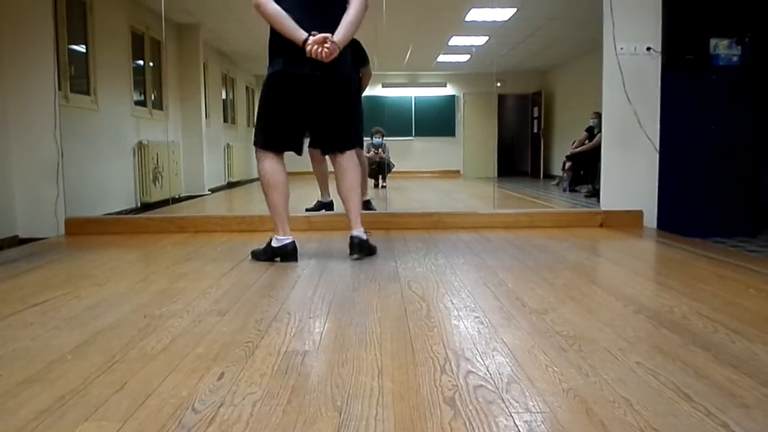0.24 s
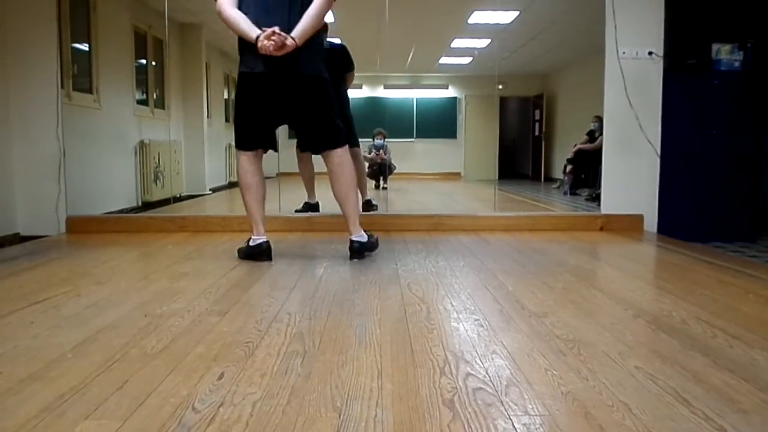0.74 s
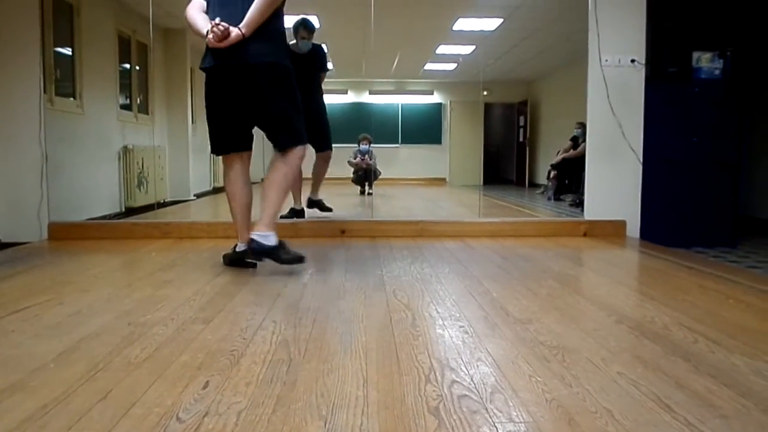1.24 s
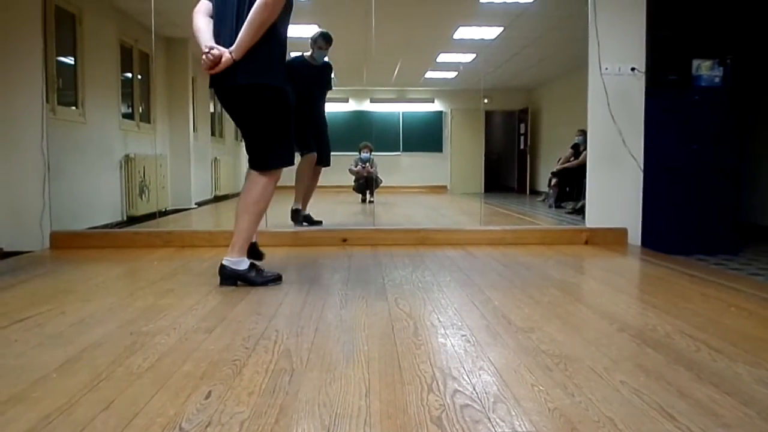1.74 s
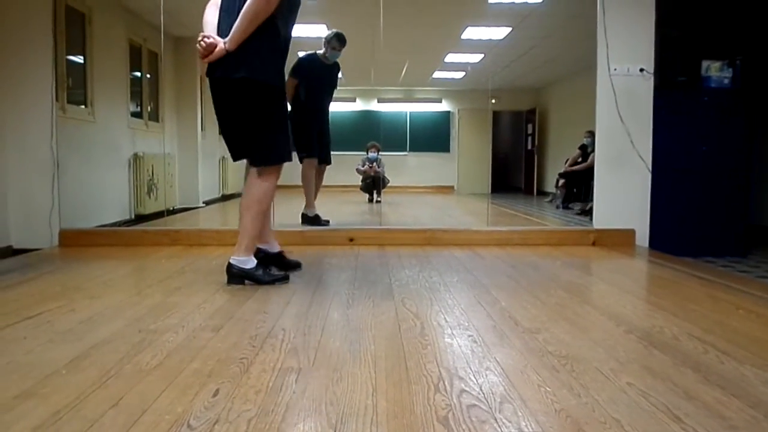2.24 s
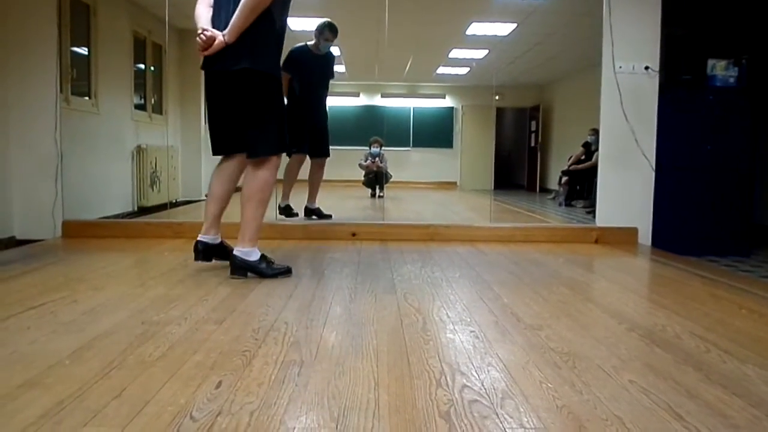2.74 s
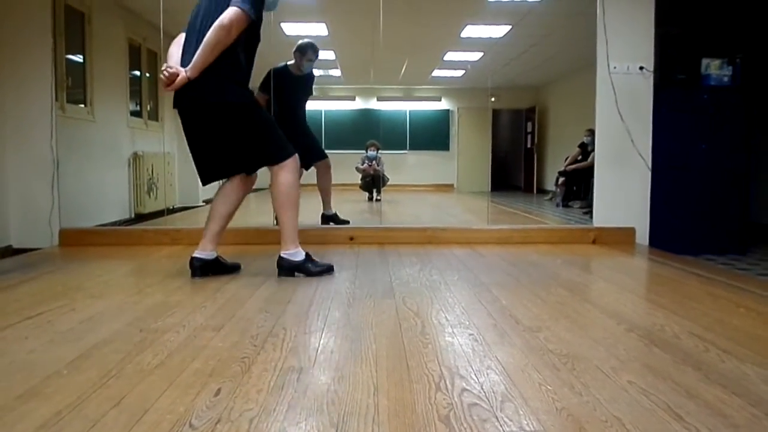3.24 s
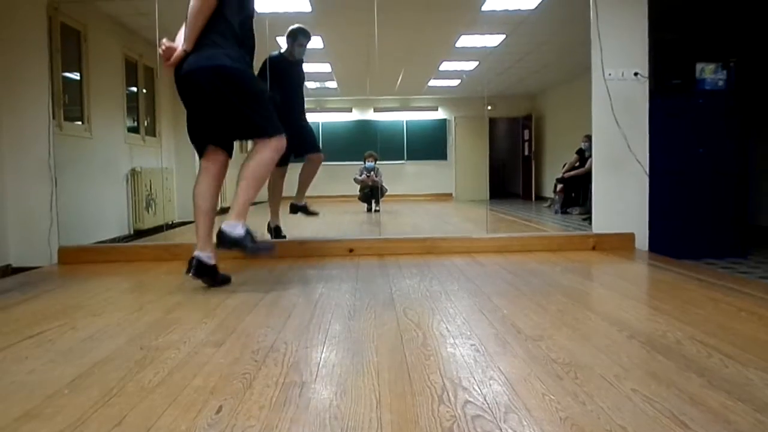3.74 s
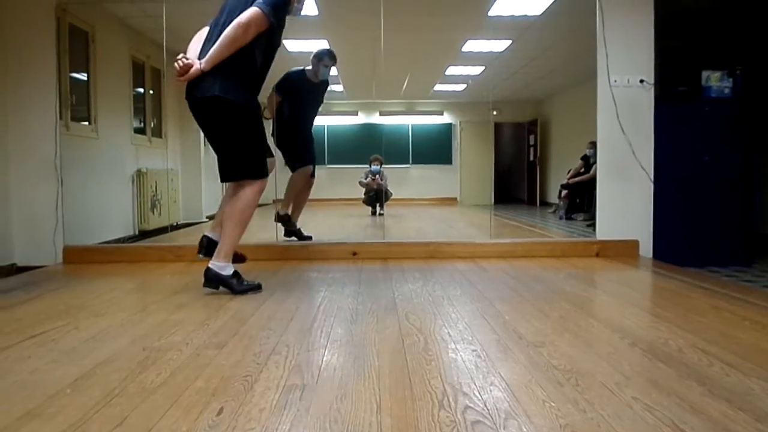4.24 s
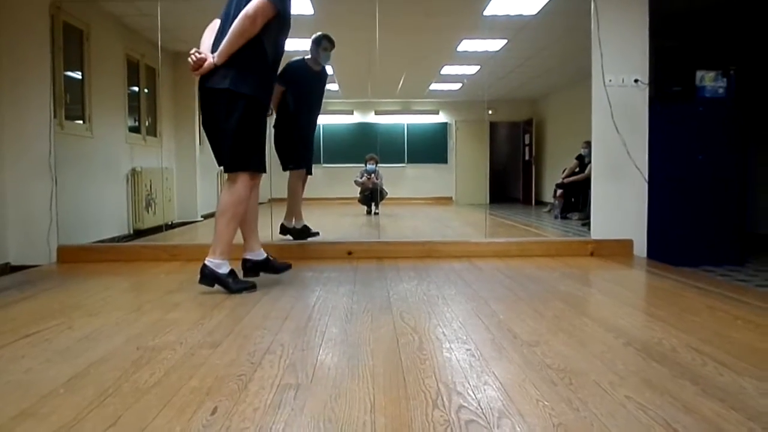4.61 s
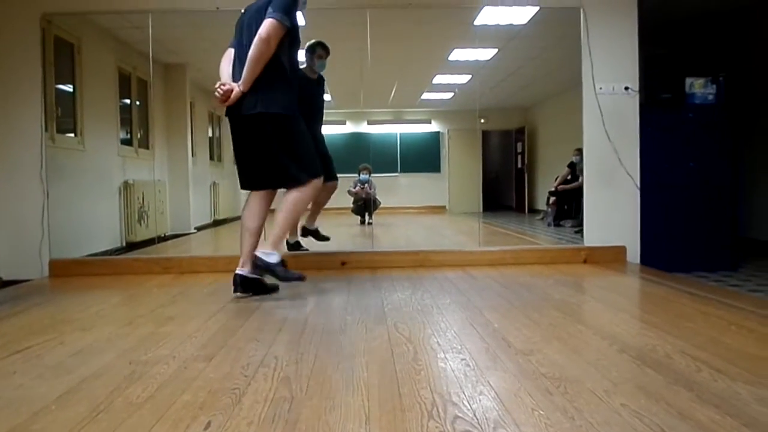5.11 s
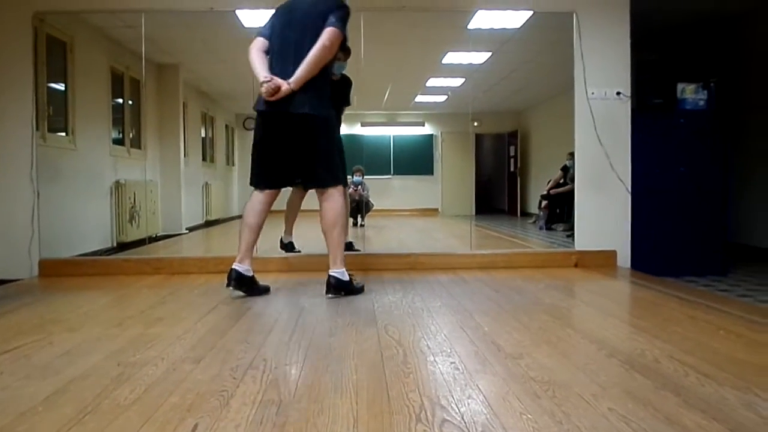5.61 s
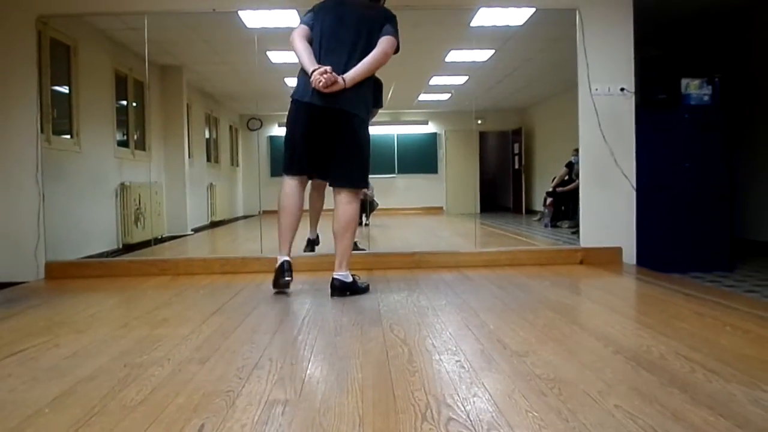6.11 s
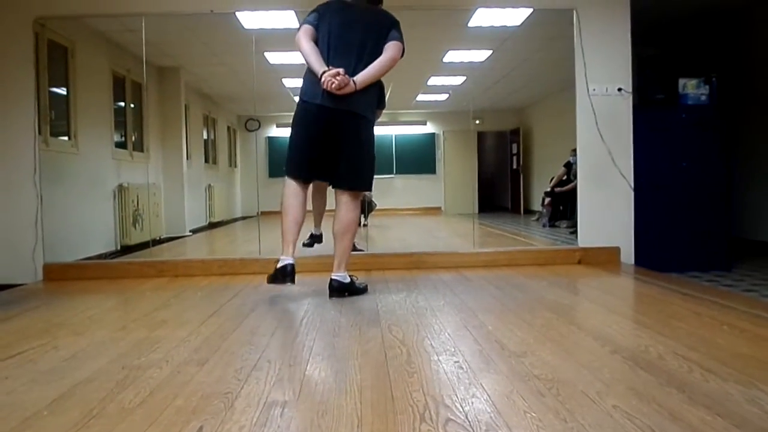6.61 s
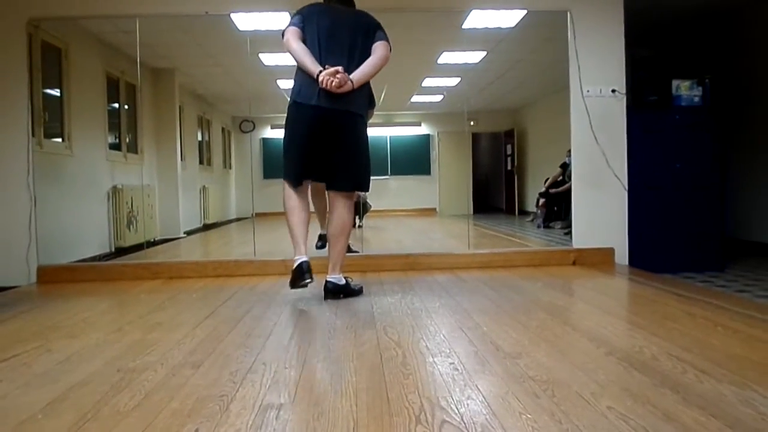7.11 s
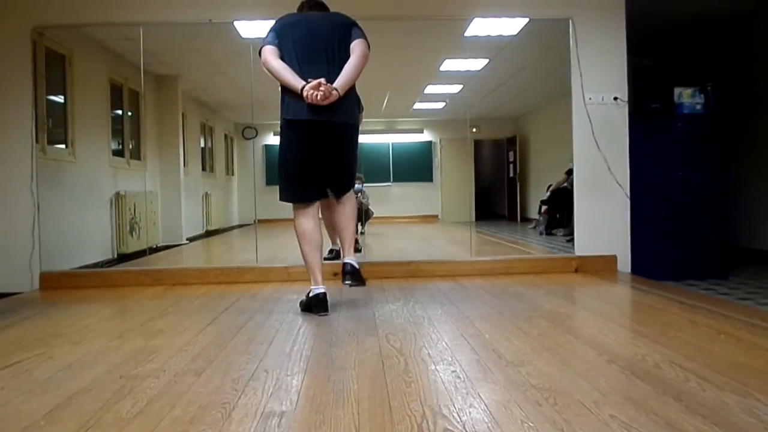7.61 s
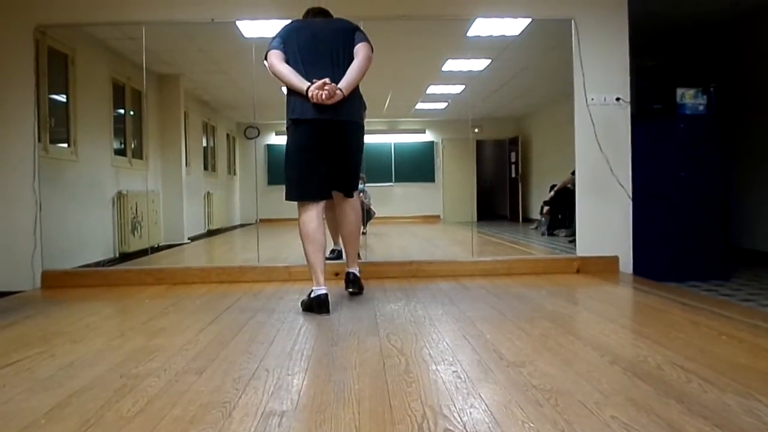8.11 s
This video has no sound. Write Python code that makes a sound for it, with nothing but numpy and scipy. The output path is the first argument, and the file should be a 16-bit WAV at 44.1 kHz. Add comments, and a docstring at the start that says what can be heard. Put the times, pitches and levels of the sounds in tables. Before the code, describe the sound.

Hard tap shoes strike a wooden floor in slow, uneven steps, each sharp crack ringing through a reverberant studio.

```python
"""A dancer's hard, nailed shoes stamp slow, uneven steps on a wooden studio floor, a few metres away.
Each impact cracks, knocks the boards and excites the floor's low modes; ceiling, mirror and walls
reflect it, then the room reverberates. Twice the nails skid with a zing; now and then a toe plate clinks.
Soles slide softly between steps, over faint room noise and a deep hum that comes and goes."""
import sys
import numpy as np
from scipy import signal
from scipy.fft import rfft, irfft, next_fast_len
from scipy.io import wavfile
from scipy.ndimage import uniform_filter1d

SR = 44100
rng = np.random.default_rng(int(sys.argv[2]) if len(sys.argv) > 2 else 0)


def master(y):
    """Save y as 16-bit WAV."""
    cut = np.clip(np.atleast_2d(y).T, -1, 1)
    pcm = np.round(cut * 32767)  # scale
    wavfile.write(sys.argv[1], SR, pcm.astype(np.int16))


N = 368235
TIME = np.arange(N) / SR
AGE = np.arange(57600) / SR  # seconds since an impact

# Blows of heel and sole. Each row: start in seconds, force in dB, weight on the foot in dB, brightness
# in dB, the struck spot's resonance in Hz, its height in dB, relative level of the direct crack in dB.
FOOTFALLS = [(0.052, 11, 11.5, -6.5, 1076, 11, -1), (0.279, -7, -14, 6, 7900, 12.5, -5),
             (0.298, 14.5, 7, -11.5, 1110, 5.5, 0), (0.591, 10, 16, -2, 924, 10.5, -4),
             (1.1313, 10, -2.5, 2.5, 4000, 3, -1.5), (1.436, 13, 0, -2.5, 2136, 3.5, -2.5),
             (1.975, 15.5, 1, -12, 830, 7, -5), (1.9962, 15, 9.5, -3.5, 5200, 4.5, 3),
             (2.281, 2.5, 15.5, 3.5, 1620, 7, -9), (2.816, 17.5, -0.5, -3.5, 7650, 8, -8.5),
             (3.116, 15, 5, -8.5, 1060, 3, -3.5), (3.137, 10, 10, 1, 7746, 3, 2.5),
             (3.541, -14, 0, -28, 990, -2, 3.5), (3.748, 7, 4, 4.5, 3200, 6.5, -5),
             (3.8322, 11.5, -5.5, -3.5, 560, 2, -2.5), (3.944, 7, -0.5, 2.5, 6770, 8, 0.5),
             (4.442, 7.5, -0.5, 3.5, 4960, 3, -10.5), (4.7337, 11.5, 7, 2.6, 2700, 5.5, 2.5),
             (5.2688, 9.5, -2.5, 3.5, 1980, 1.5, -6), (5.57, 9, 5.5, 5, 306, 6, -3),
             (6.132, 10, -11.5, -0.5, 4201, 1.5, -0.5), (6.412, 9.5, -10, -1.5, 1970, 6, -6),
             (6.69, 14, -2, -2.5, 2800, 4.5, -0.5), (6.952, 11.5, -4, -3.5, 2360, 5, -1.5),
             (7.274, 13.5, -8.5, 2, 760, 4, -2), (7.818, 10, 2.5, 2, 2560, 6.5, 7.5),
             (8.13, 10, -1, 2.3, 3770, 4.5, -2)]
# Short metallic sounds on landing. Each row: start in seconds, level in dB.
NAIL_SKIDS = [(0.057, -5), (2.003, 5.5)]
PLATE_STRIKES = [(1.13, -8), (5.269, -3), (5.568, -7), (6.13, -12), (7.816, 2)]
# Soles sliding on wood. Each row: centre in seconds, Gaussian half-width in seconds, peak level in dB.
SOLE_SLIDES = [(1.799, 0.17, -67.5), (2.523, 0.048, -52.5), (2.725, 0.09, -57.5), (4.559, 0.059, -46),
               (6.079, 0.043, -58)]
# Spells of deep hum. Each row: start in seconds, end in seconds, level in dB from which it sinks.
HUM_SPELLS = [(0, 1.09, -42), (7.326, 7.78, -56.5)]
# The floor bending on its joists. Each row: frequency in Hz, relative level in dB, T60 in seconds.
FLOOR_MODES = [(74, -17, 0.15), (91, -9.5, 0.2), (131, -15, 0.47), (153.3, 7.5, 0.38), (180, -3, 0.44),
               (324, 2, 0.85), (415, 3.5, 0.34)]
# Echoes from ceiling, mirror and side walls. Each row: typical delay in seconds, relative level in dB.
REFLECTIONS = [(.0035, -16), (.0058, -24.5), (.0078, -11), (.0095, -5), (0.0113, -10), (0.017, -7.5),
               (.058, -21.5)]
# Decay of boards and room. Each row: frequency in Hz, time to fall by 60 dB (T60) in seconds.
BOARD_DECAY = [(100, 0.33), (400, 0.41), (1500, 0.22), (12000, 0.23)]
ROOM_DECAY = [(100, 1), (300, 0.76), (800, 0.69), (2500, 0.91), (6000, 0.85), (12000, 0.67), (16000, 0.25)]
# Spectra of the sources. Each row: frequency in Hz, relative spectral density in dB.
ROOM_NOISE_SPECTRUM = [(20, 3.5), (60, -15.5), (150, 1.5), (330, 5), (800, 4.5), (1500, -7), (2600, -13),
                       (5000, -22.5), (8800, -27.5), (11800, -20.5), (16000, -41.5)]
LINGERING_SPECTRUM = [(40, -33), (100, 2), (240, 4.5), (800, -5), (2100, -16), (12000, -25.5), (16000, -38)]  # the ring of an earlier step
CRACK_SPECTRUM = [(45, -49), (100, -6), (250, 2), (550, 5), (1200, -2.5), (1800, -6), (2500, 0.5),
                  (3600, -6.5), (5400, -9), (9000, -17.5), (12000, -9), (14000, -17.5), (16500, -32.5)]  # nailed heel meeting wood
BOARD_SPECTRUM = [(45, -43), (85, -7.5), (122, -11.5), (160, -7), (350, 0), (600, 2.5), (950, -2),
                  (1500, -5), (2400, -4.5), (3600, -10), (5500, -15), (8800, -20.5), (12000, -13),
                  (14000, -29.5), (16500, -58.5)]  # struck boards and nearby surfaces
REVERB_SPECTRUM = [(50, -38.5), (100, -24), (210, -2.5), (310, 5.5), (420, 2), (700, -3.5), (1500, -12.5),
                   (2400, -15), (3800, -20), (5500, -24), (8800, -30.5), (12000, -25), (14000, -32),
                   (16500, -35)]
SKID_SPECTRUM = [(6000, -14.5), (10500, -11.5), (11800, -4.5), (12500, -2.5), (13100, -8.5), (13700, -14),
                 (16000, -33.5)]
PLATE_SPECTRUM = [(3500, -25.5), (5000, -12.5), (5750, -2.5), (6300, -14), (7500, -29.5)]
SLIDE_SPECTRUM = [(300, -10), (1000, -0.5), (3000, -4), (8000, -7), (10500, -5.5), (12300, 2), (14000, -13),
                  (16500, -23)]


def amp(db):
    """Amplitude grows tenfold for every 20 dB."""
    return 10 ** (np.asarray(db) / 20)


def unit_rms(x):
    """Normalisation to a mean power of 1."""
    return x / np.sqrt(np.mean(x ** 2) + 1e-20)


def unit_energy(x):
    """Normalisation to a total energy of 1."""
    return x / (np.linalg.norm(x) + 1e-20)


def curve_at(points, hz):
    """Interpolation of (Hz, value) points on a logarithmic frequency axis."""
    knots_hz, values = np.transpose(points)
    return np.interp(np.log(hz + 1), np.log(knots_hz + 1), values)


def colour(x, points):
    """Minimum-phase filtering: folding the cepstrum makes the (Hz, dB) gain curve causal."""
    size = next_fast_len(len(x) + 8192, True)
    size += size % 2
    gain = amp(curve_at(points, np.fft.rfftfreq(size, 1 / SR)))
    cepstrum = irfft(np.log(gain))
    cepstrum[1:size // 2] *= 2
    cepstrum[size // 2 + 1:] = 0
    return irfft(rfft(x, size) * np.exp(rfft(cepstrum)))[:len(x)]


def decay(t, t60):
    """Exponential damping: a fall of 60 dB every t60 seconds."""
    return np.exp(-np.log(1000) * t / t60)


def room_noise():
    """Stationary random noise forms a faint, steady background."""
    return amp(-57) * unit_rms(colour(rng.standard_normal(N), ROOM_NOISE_SPECTRUM))


def hum(pitch_hz=37.7, waver_hz=0.65, sag_db_per_s=15, edge_s=0.094):
    """Slow frequency modulation makes a deep tone waver; each spell of it sinks in level."""
    drift = unit_rms(uniform_filter1d(rng.standard_normal(N), size=6000))
    tone = np.sqrt(2) * np.sin(2 * np.pi * np.cumsum(pitch_hz + waver_hz * drift) / SR)
    envelope = np.zeros(N)
    for start, end, db in HUM_SPELLS:
        gate = np.clip(np.minimum(TIME - start, end - TIME) / edge_s + .5, 0, 1)
        envelope += gate * amp(db - sag_db_per_s * (TIME - start))
    return envelope * tone


def lingering_ring():
    """Reverberation outlasts its source: the studio still rings from an earlier step."""
    return amp(-38) * unit_rms(colour(rng.standard_normal(N), LINGERING_SPECTRUM)) * decay(TIME, t60=1.0)


def heel_crack(t60, grit):
    """A brief impact has a broad spectrum: the heel's edge gives an impulse, its nails a noise burst."""
    nails = unit_energy(rng.standard_normal(len(AGE)) * decay(AGE, t60))
    return unit_energy(colour(signal.unit_impulse(len(AGE)) + grit * nails, CRACK_SPECTRUM))


def dense_modes(spectrum, t60s, rise_s):
    """Densely overlapping modes sum to noise, each frequency dying at its own rate."""
    hz, t, bands = signal.stft(rng.standard_normal(len(AGE)), SR, nperseg=256)
    damped = bands * decay(t, curve_at(t60s, hz)[:, None])
    tail = signal.istft(damped, SR, nperseg=256)[1][:len(AGE)]
    onset = 1 - np.exp(-AGE / rise_s)
    return unit_energy(colour(tail * onset, spectrum))


def floor_boom(spread_db):
    """The floor's bending modes ring as damped sinusoids, at new strengths for each struck spot."""
    offsets_db = spread_db * rng.standard_normal(len(FLOOR_MODES))
    modes = (amp(db + offset) * np.sin(2 * np.pi * hz * AGE) * decay(AGE, t60)
             for (hz, db, t60), offset in zip(FLOOR_MODES, offsets_db))
    return unit_energy(sum(modes))


def early_echoes(crack, scatter):
    """Reflection returns delayed copies of the crack; the delays shift as the dancer moves."""
    echoes = np.zeros(len(AGE))
    for (delay, db), shift in zip(REFLECTIONS, rng.standard_normal(len(REFLECTIONS))):
        lag = round(delay * np.exp(scatter * shift) * SR)
        echoes[lag:] += amp(db) * crack[:len(AGE) - lag]
    return echoes


def settling_sole(first_s, last_s, count):
    """Secondary impacts follow as the sole rocks flat."""
    touches = np.zeros(len(AGE))
    for when, size in zip(rng.uniform(first_s, last_s, count), rng.standard_normal(count)):
        touches[round(when * SR)] += amp(1.4 * size) * decay(when, t60=.08)
    crack = heel_crack(t60=0.01, grit=0.99)
    return unit_energy(signal.fftconvolve(touches, crack)[:len(AGE)])


def spot_gain_db(hz, peak_hz, peak_db, log_width=0.32, ripple_db=2):
    """Resonance of shoe and board favours one broad band at each spot, among many weak peaks."""
    resonance = peak_db * np.exp(-(np.log(hz / peak_hz) / log_width) ** 2)
    return resonance + ripple_db * rng.standard_normal(len(hz))


def landing_gain_db(hz, weight_db, bright_db, thud_hz=228, hollow_hz=840, treble_hz=1400):
    """Excitation shapes the spectrum: weight lifts the thud and a hollow knock, sharpness the treble."""
    thud = 1 / (1 + (hz / thud_hz) ** 6)
    hollow = 0.085 * np.exp(-(np.log(hz / hollow_hz) / .5) ** 2)
    treble = 1 / (1 + (treble_hz / hz) ** 4)
    return weight_db * (thud + hollow) + bright_db * treble


def footsteps():
    """Superposition: each impact sounds together with the responses of boards, floor and room."""
    track = np.zeros(N + len(AGE))
    hz = np.geomspace(50, 16000, 200)
    for start, force_db, weight_db, bright_db, peak_hz, peak_db, crack_db in FOOTFALLS:
        crack = amp(-4 + crack_db) * heel_crack(t60=.004, grit=1.8)
        sole = amp(-15) * settling_sole(first_s=.004, last_s=.011, count=3)
        echoes = amp(-9) * early_echoes(heel_crack(t60=0.0092, grit=2.3), scatter=.1)
        boards = amp(-4) * dense_modes(BOARD_SPECTRUM, BOARD_DECAY, rise_s=0.0026)
        boom = amp(-16) * floor_boom(spread_db=4)
        reverb = amp(-6.5) * dense_modes(REVERB_SPECTRUM, ROOM_DECAY, rise_s=0.013)
        gain_db = landing_gain_db(hz, weight_db, bright_db) + spot_gain_db(hz, peak_hz, peak_db)
        step = colour(crack + sole + echoes + boards + boom + reverb, np.c_[hz, gain_db])
        track[round(start * SR):][:len(AGE)] += amp(force_db) * step
    # The floor radiates almost nothing below its lowest mode.
    highpass = signal.butter(N=3, Wn=62, btype="high", fs=SR, output="sos")
    return signal.sosfilt(highpass, track[:N])


def nail_skids():
    """Friction of nails on varnish excites a thin, high zing, which reverberation prolongs."""
    track = np.zeros(N + len(AGE))
    for start, db in NAIL_SKIDS:
        zing = dense_modes(SKID_SPECTRUM, t60s=[(12000, 0.16)], rise_s=0.0044)
        reverb = amp(-13.5) * dense_modes(SKID_SPECTRUM, ROOM_DECAY, rise_s=.015)
        track[round(start * SR):][:len(AGE)] += amp(db) * (zing + reverb)
    return track[:N]


def toe_plate():
    """Free vibration of the struck metal plate gives a short, bright clink, which the room prolongs."""
    track = np.zeros(N + len(AGE))
    for start, db in PLATE_STRIKES:
        clink = dense_modes(PLATE_SPECTRUM, t60s=[(5750, 0.053)], rise_s=0.00085)
        reverb = amp(-10) * dense_modes(PLATE_SPECTRUM, ROOM_DECAY, rise_s=.012)
        track[round(start * SR):][:len(AGE)] += amp(db) * (clink + reverb)
    return track[:N]


def sole_slides(grain_db=1.5):
    """Sliding friction of leather on wood makes a grainy hiss that swells and fades with pressure."""
    pressure = sum(amp(db) * np.exp(-((TIME - centre) / width) ** 2 / 2)
                   for centre, width, db in SOLE_SLIDES)
    grain = unit_rms(uniform_filter1d(rng.standard_normal(N), size=300))
    friction = rng.standard_normal(N) * amp(grain_db * grain)
    return pressure * unit_rms(colour(friction, SLIDE_SPECTRUM))


def scene():
    """Sound pressures add: dancer and background meet at one listening point."""
    dancer = footsteps() + toe_plate() + nail_skids() + sole_slides()
    return (dancer + hum() + room_noise() + lingering_ring())[None]


def record(dry):
    """Saturation rounds off the hardest cracks; a steep low-pass filter then limits the bandwidth."""
    limit, cutoff_hz = 0.7, 16500
    saturated = dry / (1 + np.abs(dry / limit) ** 6) ** (1 / 6)
    size = next_fast_len(N + 8192, True)
    passband = 1 / (1 + (np.fft.rfftfreq(size, 1 / SR) / cutoff_hz) ** 160)
    return irfft(rfft(saturated, size) * passband, size)[:, :N]


dry = scene()
out = record(dry)
master(out)
```